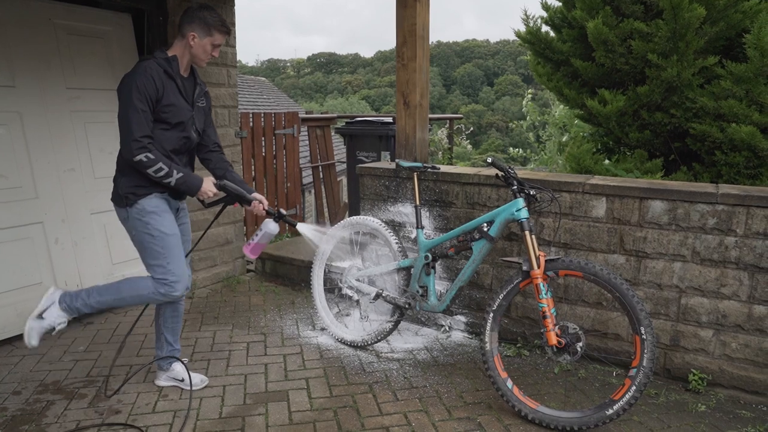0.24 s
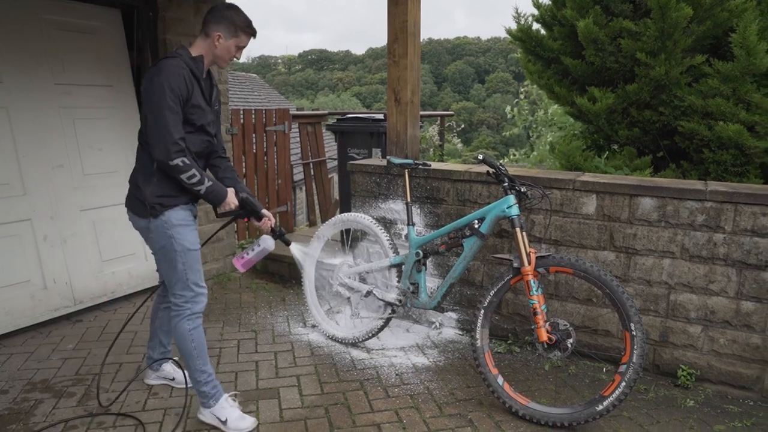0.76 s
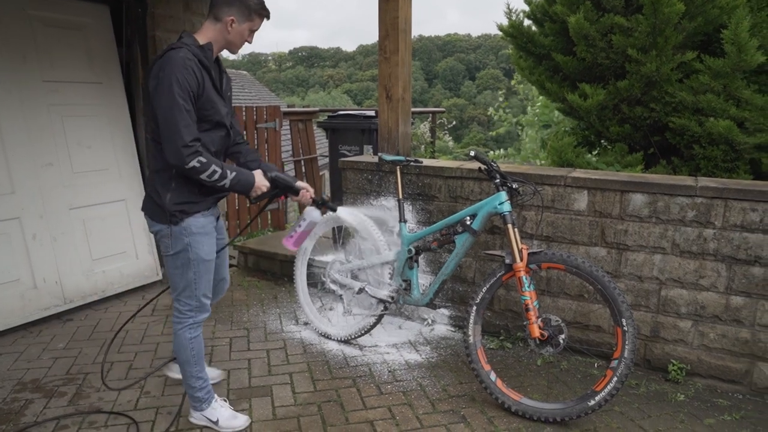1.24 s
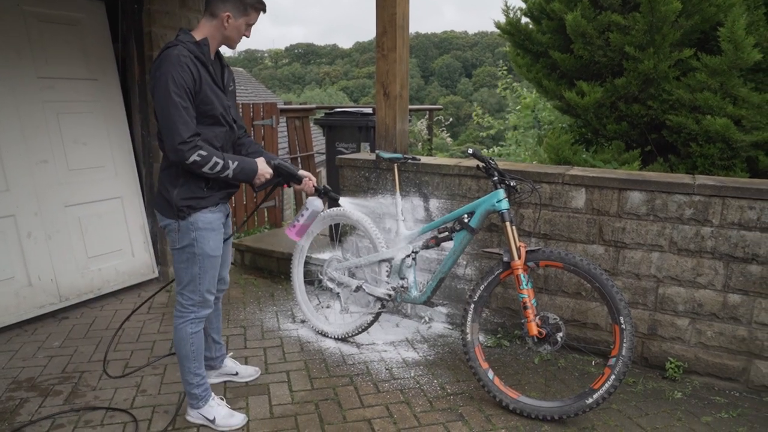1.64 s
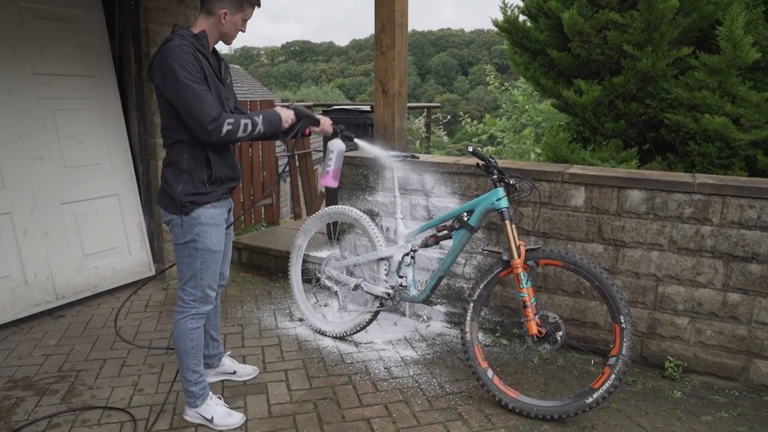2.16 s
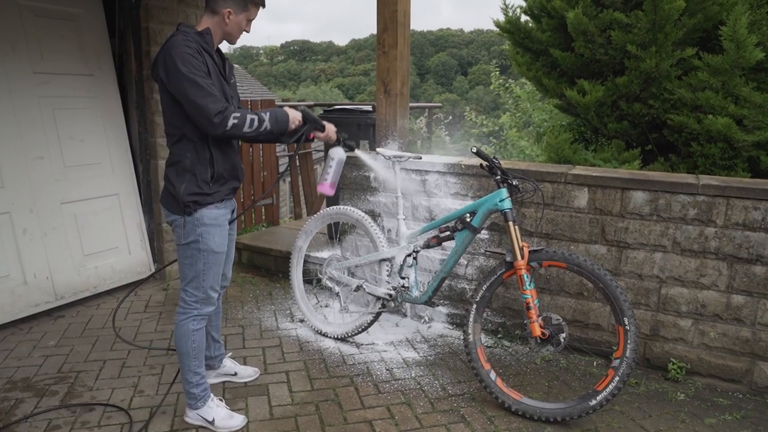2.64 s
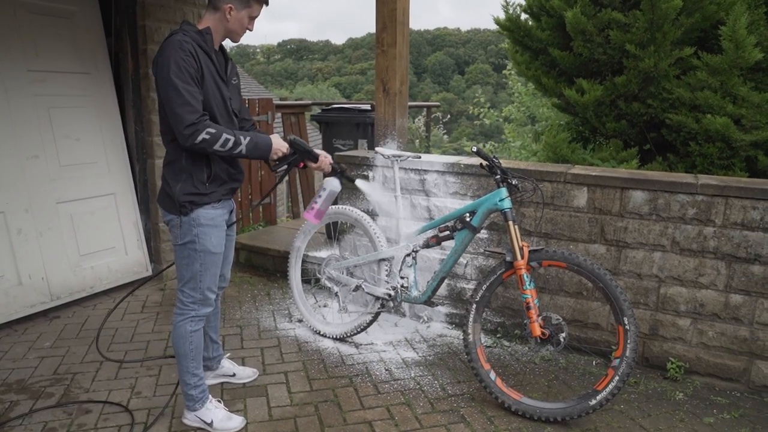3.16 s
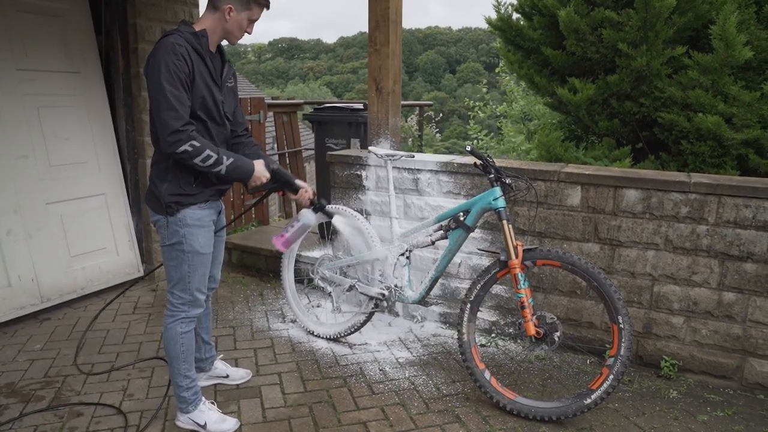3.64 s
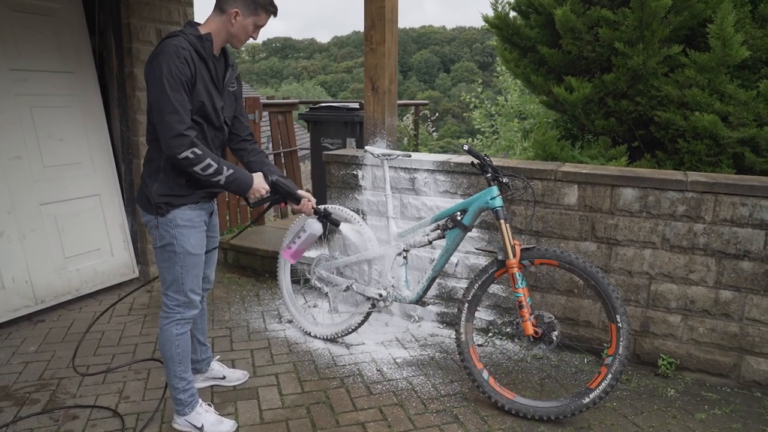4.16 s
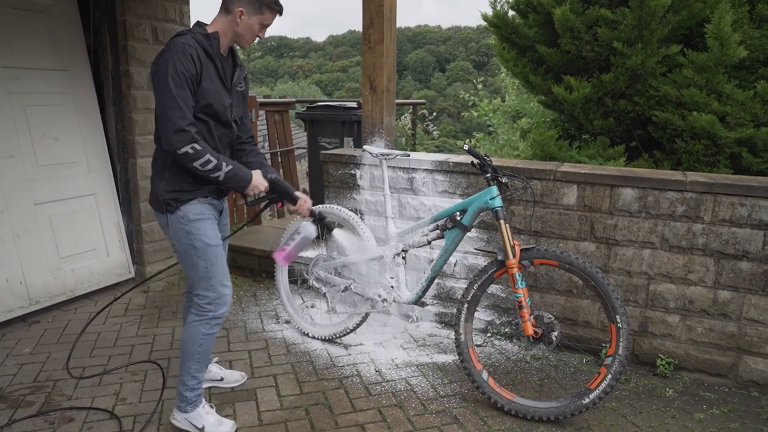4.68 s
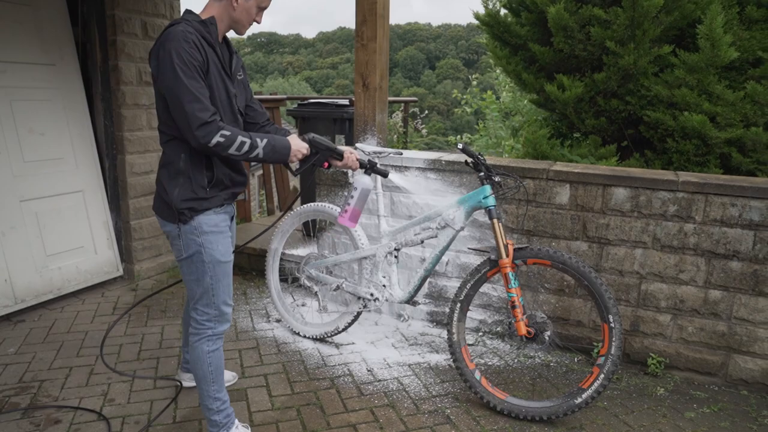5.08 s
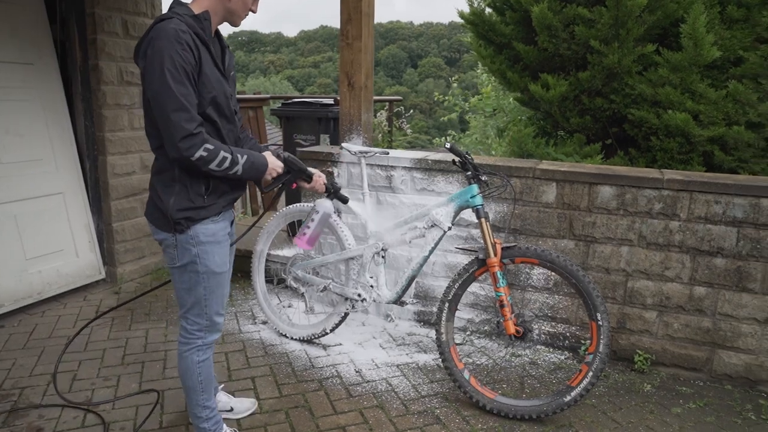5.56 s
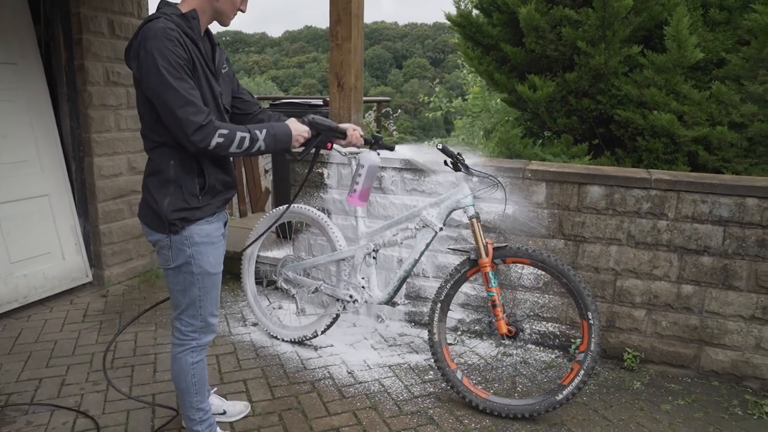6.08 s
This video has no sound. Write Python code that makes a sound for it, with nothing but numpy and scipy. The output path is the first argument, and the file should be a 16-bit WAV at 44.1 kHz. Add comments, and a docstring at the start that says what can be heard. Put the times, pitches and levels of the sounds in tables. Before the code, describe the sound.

On a walled outdoor patio, an electric pressure washer runs throughout with a steady, pitched motor and pump drone. Over it a lance sprays foam with a loud, hollow hiss, broken by brief thin whistles. The foam lands on a bicycle and the wall with a fine crackle, strongest near the end. The microphone is close and catches a faint rumble of breeze.

```python
"""A walled patio, one microphone close by: an electric pressure washer sprays foam on a bicycle.
From the start its geared motor and three-piston pump drone and beat, while the lance, at its loudest,
hisses and whistles through hollow resonances and foam spatters on tyres, frame and wall. Just after 1 s
the cooling fan's rush drops; at 1.7 s a gust touches the microphone. The lance is held highest at 2.4 s,
sliding the echo off the paving. The spatter peaks near 5 s, then the drone eases a little."""
import sys
import numpy as np
from scipy import signal
from scipy.fft import rfft, irfft, next_fast_len
from scipy.io import wavfile
from scipy.ndimage import map_coordinates

SR = 44100
rng = np.random.default_rng(int(sys.argv[2]) if len(sys.argv) > 2 else 0)


def master(y):
    """Save y as 16-bit WAV."""
    cut = np.clip(np.atleast_2d(y).T, -1, 1)
    pcm = np.round(cut * 32767)  # scale
    wavfile.write(sys.argv[1], SR, pcm.astype(np.int16))


N = 278712
TIME = np.arange(N) / SR

# how loudly the lance rushes, against its usual level: t/s, level/dB
LANCE_RUSH = [(0, 3.5), (.5, 2.5), (.92, 1), (1.55, 0.5), (1.85, -0.3), (2.15, .3), (2.5, -.5), (3.2, 0.4),
              (3.85, -.4), (4.1, .2), (5.1, 0), (5.65, -1.2), (6.0, 0.1), (6.32, -1.7)]
# the flow locks onto a resonance and whistles: middle t/s, length/s, f/Hz, level/dB, glide/(Hz/s)
LANCE_WHISTLES = [(.17, 0.13, 3420, -20, -400), (.21, .28, 2450, -20, -600), (.22, .35, 7670, -21, -3),
                  (.45, .3, 3600, -21, -300), (.7, 0.19, 2506, -24, 2), (1.0, .3, 2525, -19.5, -400),
                  (1.079, .34, 965, -21.5, -5), (1.25, .2, 3553, -20, -900), (1.419, .16, 3540, -21, -200),
                  (1.63, .16, 3560, -20, 704), (1.78, .36, 2570, -23, 1300), (1.97, .1, 3500, -21, 0),
                  (2.16, .12, 3470, -27, 4), (2.86, .14, 3430, -19, -400), (2.86, .14, 2548, -24, 400),
                  (3.0, 0.11, 3490, -17, -2), (3.2, 0.13, 3585, -20, -2), (3.33, 0.39, 2480, -17.5, -500),
                  (3.79, .18, 3490, -22, 302), (4.02, 0.29, 980, -24, 0), (4.67, .16, 3440, -25.5, 0),
                  (5.05, .14, 2490, -19, -400), (5.06, 0.18, 3464, -22, -200), (5.208, .2, 7750, -23, 2),
                  (5.47, .16, 3540, -24.5, 0), (6.002, 0.27, 6010, -27, 0), (6.05, .2, 2530, -21, 0),
                  (6.16, .2, 896, -24, 0)]
# foam landing, louder on tyre and frame, softer through the gaps: t/s, relative level/dB
FOAM_LANDING = [(0.0, -39), (0.14, -34), (0.6, -31.5), (0.98, -39.5), (1.11, -34.5), (1.65, -31),
                (1.81, -37), (2.18, -33), (2.83, -37), (2.92, -39.5), (3.55, -33.5), (4.96, -33.5),
                (5.03, -28.5), (5.12, -32.5), (5.67, -35.5), (6.07, -31.5), (6.2, -38), (6.32, -31.5)]


def washer(shaft):
    """Piston strokes sound multiples of the shaft rate; twice the rotor rate beats against order nine."""
    # strong tones swell and fade as the sound paths shift: t/s, level/dB of rotor, pump order 6, order 9
    drone = [(0, -26, -29, -26), (0.28, -27.5, -27, -23.5), (0.52, -28, -37.5, -23),
             (0.78, -30.5, -30.5, -25), (0.97, -30, -35, -28.5), (1.15, -32, -36, -31),
             (1.27, -33, -35, -27.3), (2.0, -32.5, -34, -26.3), (2.7, -30.5, -32, -24.7),
             (3.45, -32, -33, -25.5), (4.85, -31.5, -31, -26.7), (5.35, -33, -35.3, -33.3),
             (6.0, -33, -33.5, -31.5), (6.32, -34.5, -37.5, -30.5)]
    # weaker pump tones: multiple of shaft rate, level/dB
    pump_orders = [(1, -65.5), (2, -64), (4, -49), (5, -47.5), (7, -50), (8, -39), (10, -38.5), (11, -38),
                   (12, -36.5), (13, -44.5), (14, -40.5), (15, -38), (16, -44.5), (17, -43), (18, -44.5),
                   (19, -44.5), (20, -42.5), (21, -44), (24, -67), (50, -46)]
    # motor overtones: multiple of rotor rate, level/dB
    motor_orders = [(2, -41), (3, -52), (7, -51), (11, -45)]
    gear_ratio = 4.548
    rotor = gear_ratio * shaft
    rotor_db, sixth_db, ninth_db = in_time(drone)
    swing_db = rotor_db - rotor_db.mean()
    strokes = (3, -40 + 0.64 * swing_db), (6, sixth_db), (9, ninth_db)
    pistons = sum(tone(order * shaft, db, unsteady=.06) for order, db in strokes)
    knock = sum(tone(order * shaft, db + 0.53 * swing_db, unsteady=0.17) for order, db in pump_orders)
    whine = tone(rotor, rotor_db, unsteady=0.069)
    whine += sum(tone(order * rotor, db, unsteady=0.042) for order, db in motor_orders)
    # the load varies once per pump turn and puts a side tone below the rotor's
    side_tone = tone(rotor - shaft, rotor_db - 15.5, unsteady=0.1)
    return pistons + knock + whine + side_tone


def lance(shaft):
    """Five hollow resonances follow the rush and foam mix; the lowest two throb with the pump's ripple."""
    # richer or leaner foam shifts the resonances: t/s, relative shift
    foam_mix = [(0, 0.0075), (.8, 0.017), (1.6, 0.0014), (2.7, -0.0074), (3.4, 0), (4.1, -.014),
                (5.1, -.005), (5.5, 0.015), (6.32, 0.0076)]
    # the lance's resonances: f/Hz, level/dB, width/Hz, skirt/Hz, wander/Hz,
    # weights of rush, foam shift and pump ripple, trend/(dB/s)
    resonances = [(947.6, -31.5, 150, 166, 14.04, 1.3, .3, 1, 0.04),
                  (2524, -24.5, 330, 430, 20, .4, 1, 0.35, -.1),
                  (3521, -26, 280, 310, 20, 0.69, 1, 0, -0.25), (5980, -30, 420, 870, 25, 1.7, .2, 0, 0.56),
                  (7823, -30, 820, 700, 110, 1.74, -.5, 0, 0)]
    rush_db, = in_time(LANCE_RUSH)
    shift, = in_time(foam_mix)
    ripple = 0.11 * np.sin(2 * np.pi * shaft) + 0.16 * np.sin(4 * np.pi * shaft)
    out = np.zeros(N)
    for hz, db, width_hz, skirt_hz, wander_hz, follows, shifts, throbs, db_per_s in resonances:
        level_db = db + follows * rush_db + db_per_s * (TIME - TIME.mean())
        level_db -= 0.5 * whistling(hz, width_hz)   # the broad rush gives way to a whistle
        ringing = resonance(hz * (1 + shifts * shift), width_hz, skirt_hz, wander_hz)
        out += from_db(level_db) * (1 + throbs * ripple) * ringing
    return out


def resonance(centre_hz, width_hz, skirt_hz, wander_hz):
    """Turbulence rings a resonance whose centre wanders and whose strength flickers."""
    flare_db = 0.48 * drift(9)
    # driven harder than usual, more of the broad rush focuses into a breathy whistle
    focus = np.clip(0.13 + 0.091 * flare_db, 0, .7)
    rush = np.sqrt(1 - focus) * narrow_noise(width_hz, skirt_hz)
    whistle = np.sqrt(focus) * narrow_noise(width_hz=72, skirt_hz=skirt_hz / 4)
    turns = np.cumsum(centre_hz + wander_hz * drift(14.01)) / SR
    return from_db(flare_db) * rms_one(np.real((rush + whistle) * np.exp(2j * np.pi * turns)))


def jet():
    """The fan of foam hisses through the air, louder where more lands and with the lance held high."""
    # spectrum of the hiss: f/Hz, relative level/dB
    hiss_colour = [(90, -37), (180, -25), (300, -7.5), (450, -19.5), (700, -13.5), (1100, 3.5), (1350, -4),
                   (1650, 0), (2000, -1.5), (2900, 3), (3600, 2.5), (4200, -3), (6800, -3), (8500, -1),
                   (9300, -3), (10000, -18.5), (16000, -30)]
    rush_db, = in_time(LANCE_RUSH)
    landing_db, = in_time(FOAM_LANDING)
    raised_db = 1.0 * lance_height()
    level_db = -23 + 0.82 * rush_db + 0.053 * (landing_db - landing_db.mean()) + raised_db
    return coloured(rng.standard_normal(N), hiss_colour) * from_db(level_db + 0.59 * drift(25))


def whistles():
    """The flow locks into thin, quivering tones that swell, glide a little and fade."""
    quiver = rms_one(1 + 0.73 * narrow_noise(width_hz=140, skirt_hz=160))
    waver = 1 + 0.01108 * drift(22.2)
    out = np.zeros(N)
    for s, length_s, hz, db, glide in LANCE_WHISTLES:
        on = np.abs(TIME - s) < length_s / 2
        turns = rng.random() + np.cumsum(hz * waver[on] + glide * (TIME[on] - s)) / SR
        out[on] += from_db(db) * swell(s, length_s)[on] * np.real(quiver[on] * np.exp(2j * np.pi * turns))
    return out


def whistling(hz, width_hz):
    """How far the flow is locked onto the resonance at this frequency."""
    return sum(swell(s, length_s) for s, length_s, pitch_hz, _, _ in LANCE_WHISTLES
               if abs(pitch_hz - hz) < width_hz)


def spatter():
    """Countless droplets and bursting foam cells crackle where the jet lands."""
    # spectrum of the crackle: f/Hz, relative level/dB
    crackle_colour = [(1500, -17), (5000, 1.5), (9000, 8), (10500, -1.5), (12000, 1.5), (13800, 1),
                      (14800, -2.5), (16000, -7.5)]
    droplets_per_s = 11000
    landing_db, = in_time(FOAM_LANDING)
    hits = rng.random(N) < droplets_per_s / SR
    sizes = from_db(2.5 * np.minimum(rng.exponential(1, N), 6)) * rng.choice([-1, 1], N)
    return coloured(hits * sizes, crackle_colour) * from_db(landing_db + 7.0 + 0.67 * drift(40))


def drops():
    """A larger drop lands as a short bright slap."""
    # drops hitting the bicycle: t/s, relative level/dB
    slaps = [(.047, -17), (.805, -15), (5.264, -19), (5.805, -14)]
    decay_s = 0.002
    envelope = np.zeros(N)
    for s, db in slaps:
        age = TIME - s
        envelope += (age >= 0) * from_db(db) * np.exp(-np.abs(age) / decay_s)
    band = signal.butter(2, [1500, 9000], "band", fs=SR, output="sos")
    return 1.2 * envelope * rms_one(signal.sosfilt(band, rng.standard_normal(N)))


def cooling_fan():
    """Air rushes through the motor's fan, loudest in the first second."""
    # strength of the air rush: t/s, level/dB
    fan_level = [(0, -30.5), (1.13, -33), (1.32, -42), (3, -37.8), (4.9, -37.5), (5.5, -36), (6.32, -36)]
    # its spectrum: f/Hz, relative level/dB
    fan_colour = [(30, -19), (70, -16), (110, -23), (170, -9.5), (300, -3.5), (430, -1.5), (550, 5),
                  (700, -0.5), (1100, -1), (1650, 4.5), (2100, -17), (4000, -33)]
    fan_db, = in_time(fan_level)
    return from_db(fan_db) * coloured(rng.standard_normal(N), fan_colour)


def patio(direct):
    """Echoes off paving and nearby walls comb the hiss with fine ridges that slide as the lance moves."""
    # echoes off garden wall, door and house: delay/s, relative level/dB
    wall_echoes = [(.0046, -14.5), (.0067, -9.5), (.0094, -8), (0.0154, -9)]
    paving_s = .0021 + 0.001995 * lance_height()
    paths = [(paving_s, -9.0)] + [(s + 0.000167 * drift(1.24), db) for s, db in wall_echoes]
    echoes = sum(from_db(db) * map_coordinates(direct, [(TIME - s) * SR], order=1, mode="mirror")
                 for s, db in paths)
    # rough brick and stone scatter the top away
    dulled = signal.sosfilt(signal.butter(1, 7000, fs=SR, output="sos"), echoes)
    return from_db(-0.91) * (direct + dulled)


def lance_height():
    """Nought with the lance at the wheel, one with it above the saddle."""
    # the lance is raised: middle t/s, length/s, share of full height
    lifts = [(1.6, 0.44, .25), (2.417, 1.197, 1), (3.25, .5, 0.46), (5.196, 0.797, 0.408), (6.3, 1.33, .7)]
    return sum(height * swell(s, length_s) for s, length_s, height in lifts)


def breeze():
    """Air rumbles softly right on the microphone, swelling in gusts."""
    # gusts on top of the light breeze: middle t/s, length/s, level/dB
    gusts = [(.6, 2.7, -46), (1.72, 0.55, -38), (2.25, 1.1, -46), (4.949, 0.27, -49), (6.18, .5, -42)]
    # spectrum of the rumble: f/Hz, relative level/dB
    wind_colour = [(12, 10), (22, 6), (45, -13), (90, -20), (250, -44)]
    strength = from_db(-53.5) + sum(from_db(db) * swell(s, length_s) for s, length_s, db in gusts)
    return strength * from_db(drift(6)) * coloured(rng.standard_normal(N), wind_colour)


def tone(turns, level_db, unsteady):
    """One machine tone whose strength and timing waver a little."""
    phase = 2 * np.pi * (turns + rng.random()) + unsteady * drift(9.0)
    return np.sqrt(2) * from_db(level_db) * (1 + unsteady * drift(18)) * np.sin(phase)


def narrow_noise(width_hz, skirt_hz):
    """Complex noise around 0 Hz with a resonance's width and steeper far skirts; unit power."""
    ringing = rng.standard_normal(N + 4000) + 1j * rng.standard_normal(N + 4000)
    for reach_hz in (width_hz / 2, skirt_hz):
        ringing = signal.lfilter([1], [1, -np.exp(-2 * np.pi * reach_hz / SR)], ringing)
    return rms_one(ringing[-N:])


def coloured(x, colour):
    """Give a sound a smooth spectrum; unit power."""
    hz, db = np.transpose(colour)
    size = next_fast_len(N)
    bins = np.maximum(np.arange(size // 2 + 1) * SR / size, 1)
    gain = from_db(np.interp(np.log(bins), np.log(hz), db))
    return rms_one(irfft(rfft(x, size) * gain, size)[:N])


def drift(rate_hz):
    """Smooth chance with spread 1, changing at about the given rate."""
    size = next_fast_len(N)
    bins = np.arange(size // 2 + 1) * SR / size
    return rms_one(irfft(rfft(rng.standard_normal(size)) / (1 + (bins / rate_hz) ** 2), size)[:N])


def swell(middle_s, length_s):
    """A smooth rise to one and fall back to nothing."""
    return np.cos(np.pi * np.clip((TIME - middle_s) / length_s, -.5, .5)) ** 2


def in_time(rows):
    """The columns of a curve table at every sample."""
    s, *columns = np.transpose(rows)
    return [np.interp(TIME, s, c) for c in columns]


def from_db(db):
    """Decibels to gain."""
    return 10 ** (np.asarray(db) / 20)


def rms_one(x):
    """Scale to unit power."""
    return x / np.sqrt(np.mean(np.abs(x) ** 2) + 1e-20)


def scene():
    """All sources reach one microphone, the same on both channels."""
    # turning rate of the pump shaft: t/s, f/Hz
    shaft_speed = [(0, 79.4), (0.3, 80.04), (0.8, 80.1), (1.1, 80.66), (1.45, 80.58), (1.95, 80.33),
                   (2.4, 80.12), (3.55, 80.5), (3.95, 80.3), (4.3, 80.4), (4.9, 80.47), (6.32, 80.5)]
    shaft_hz, = in_time(shaft_speed)
    shaft = np.cumsum(shaft_hz) / SR   # turns
    machine = washer(shaft) + cooling_fan()
    spray = patio(lance(shaft) + jet()) + whistles()
    sound = machine + spray + spatter() + drops() + breeze()
    return np.stack([sound, sound])


def record(dry):
    """The top of the treble is cut steeply."""
    cutoff_hz = 15750
    return signal.sosfilt(signal.ellip(12, .1, 90, cutoff_hz, fs=SR, output="sos"), dry)


dry = scene()
out = record(dry)
master(out)
```